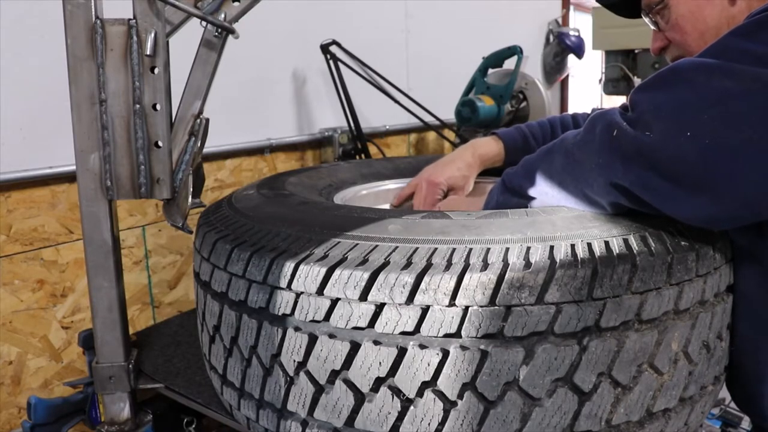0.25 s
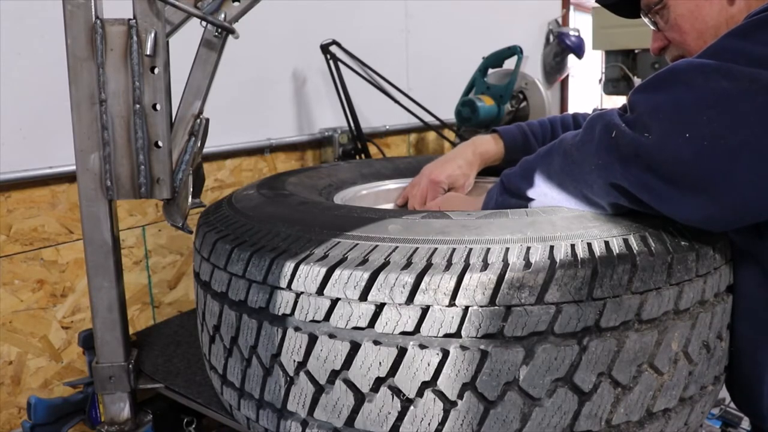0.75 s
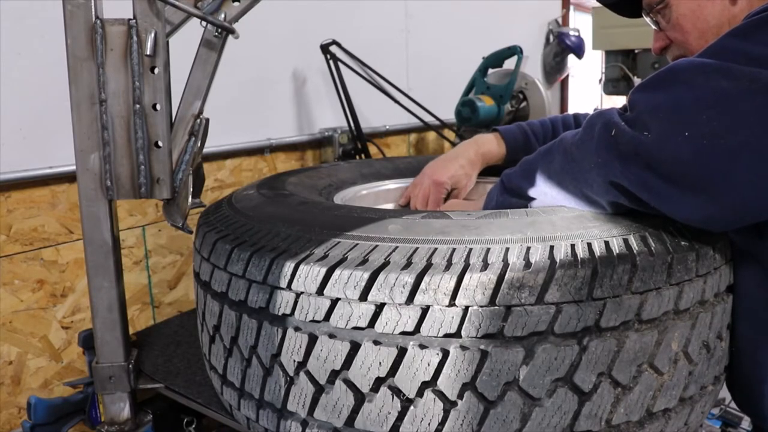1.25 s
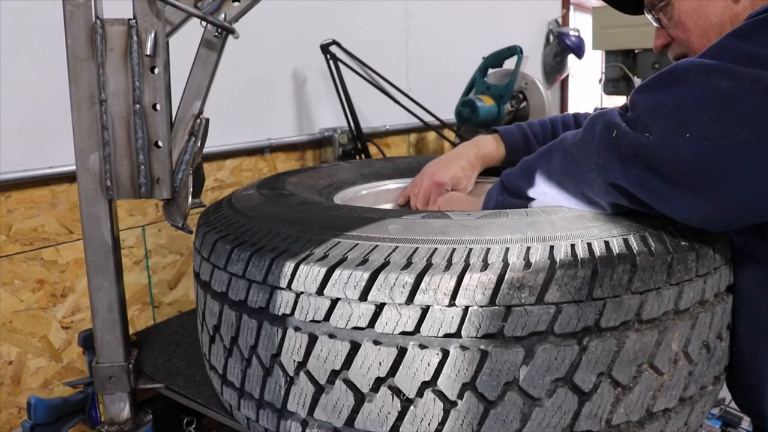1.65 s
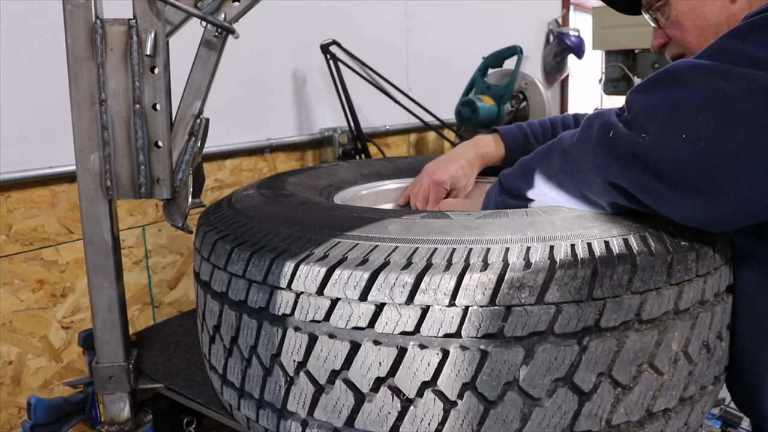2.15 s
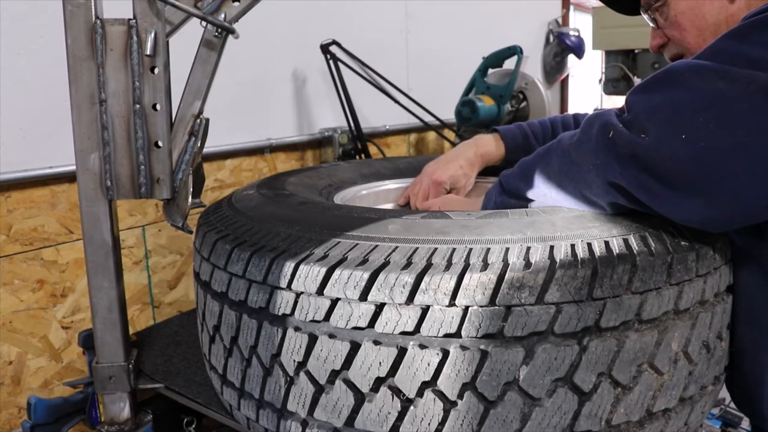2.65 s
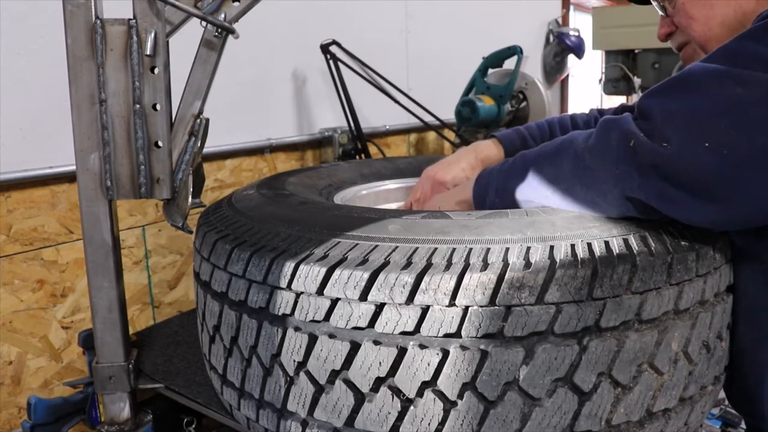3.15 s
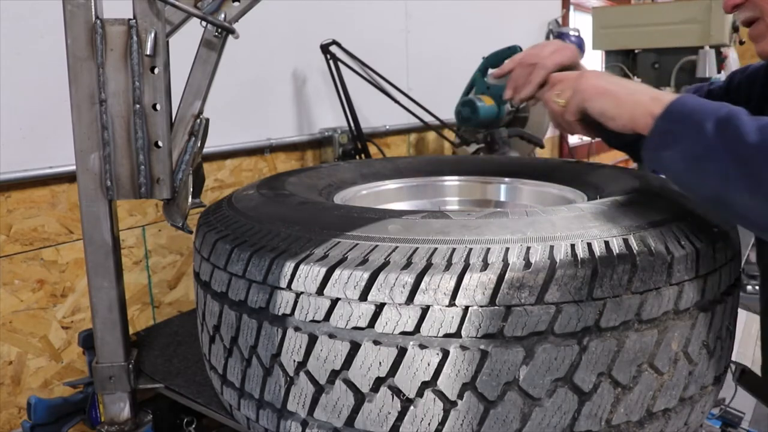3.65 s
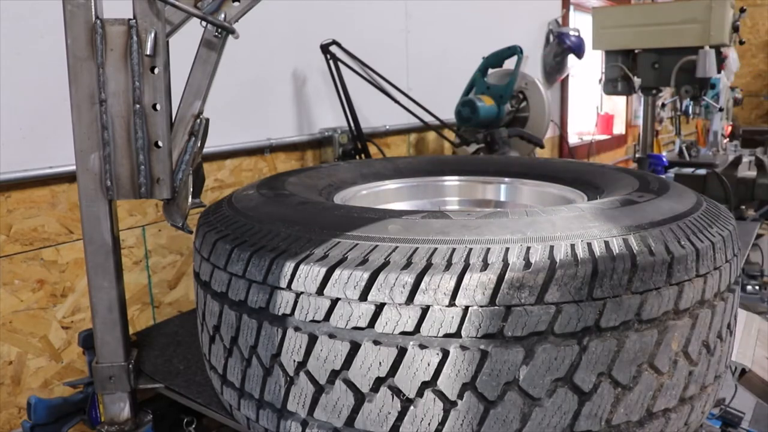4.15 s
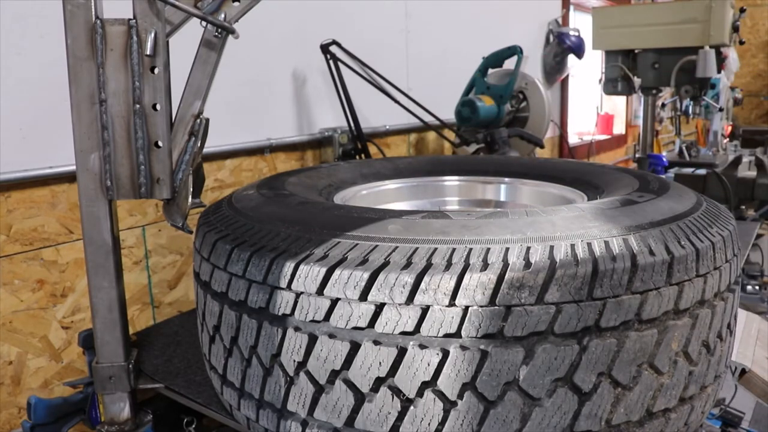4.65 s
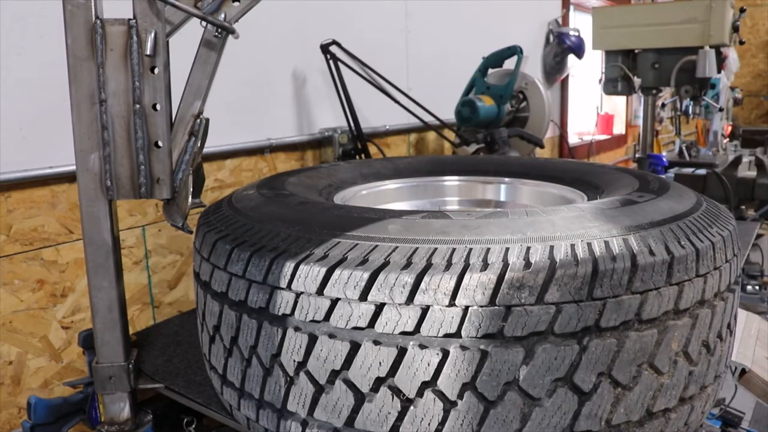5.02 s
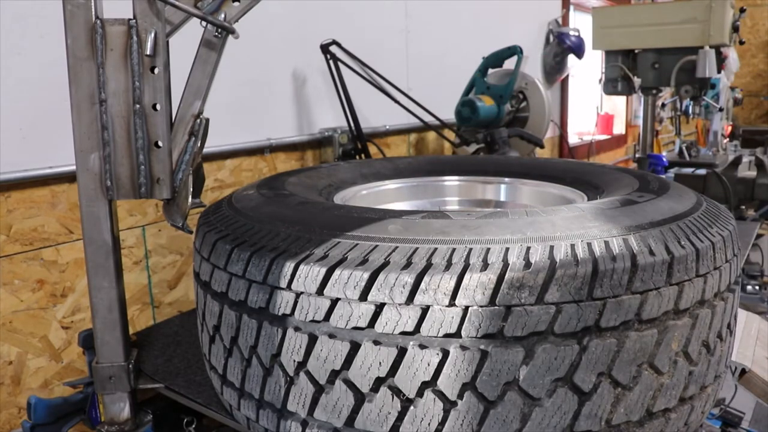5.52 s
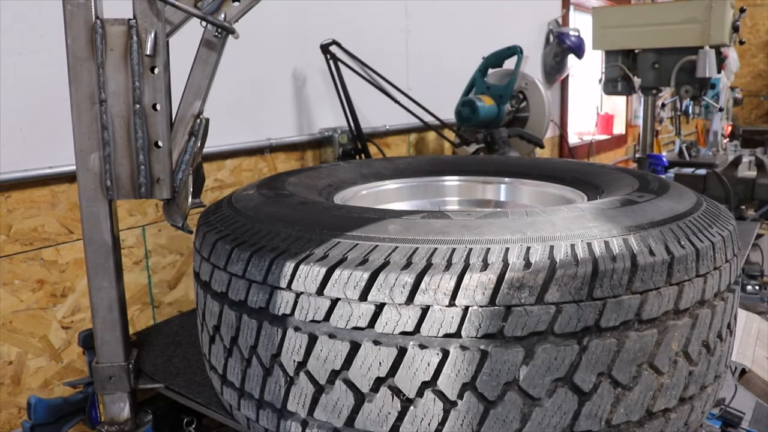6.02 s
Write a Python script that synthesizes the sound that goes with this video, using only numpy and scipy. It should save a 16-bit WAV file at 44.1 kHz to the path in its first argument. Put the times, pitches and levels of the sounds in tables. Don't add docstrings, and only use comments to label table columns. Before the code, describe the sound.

Quiet breathy leak of air under working fingers, a sudden stronger rush, short rubbery squeal and pop, then constant piercing jet of escaping air.

```python
import sys
import numpy as np
from scipy import signal
from scipy.fft import rfft, irfft, next_fast_len
from scipy.io import wavfile
from scipy.ndimage import uniform_filter1d

SR = 44100
rng = np.random.default_rng(int(sys.argv[2]) if len(sys.argv) > 2 else 0)


def output_pcm(signal):
    pcm = np.clip(np.atleast_2d(signal).T, -1, 1) * 32767
    wavfile.write(sys.argv[1], SR, np.round(pcm).astype(np.int16))


def field_ratio(decibels):
    return 10 ** (np.asarray(decibels, dtype=float) / 20)


N = 276948
HOP = 1024
EDGE_HZ = 15740

# t/s, share/0-1
CORE_OUT_SHARE = [(0, 0), (3.02, 0.1), (3.2, 0.42), (3.4, 0.9), (6.28, 1)]


def read(points, hz):
    f, value = np.transpose(points)
    return np.interp(np.log(hz + 1), np.log(f + 1), value)


def evened(x):
    return x / np.sqrt(np.mean(x ** 2) + 1e-20)


def humps_db(modes, hz):
    return sum(db / (1 + (2 * (hz - f) / width) ** 2) for f, width, db in modes)


def coloured(points):
    size = next_fast_len(N)
    hz = np.fft.rfftfreq(size, 1 / SR)
    spectrum = rfft(rng.standard_normal(size)) * field_ratio(read(points, hz))
    return evened(irfft(spectrum, size)[:N])


def turned_down():
    # t/s, share/0-1
    gain_down = [(0, 0), (2.56, 0.08), (2.66, 0.77), (6.28, 0.8)]
    return np.clip(np.interp(np.arange(N) / SR, *np.transpose(gain_down)), 0, 1)


def hiss(patchy_db=0.83, flicker_db=.5):
    # f/Hz, density/dB per Hz
    leak_spectrum = [(240, -58), (400, -28), (536, -33), (596, -12.5), (654, -12), (945, -8.5), (1350, 2),
                     (1980, -9), (3820, -7), (4460, -8), (6250, -9.5), (8900, -7), (9750, -5.5),
                     (11000, -8.5), (15700, -19)]
    # f/Hz, density/dB per Hz
    jet_spectrum = [(240, -54), (400, -19.5), (578, -43), (615, -20.5), (728, -22), (945, -24.5),
                    (1830, -13), (2010, -15.5), (2860, -12.5), (3590, -11.5), (4600, -10.5), (6350, -16),
                    (8900, 1.5), (11900, -12), (15700, -10)]
    # f/Hz, width/Hz, lift/dB
    stem_in = [(8730, 180, 8), (11000, 220, 6), (7000, 260, 5), (4400, 200, 4), (12100, 300, 4)]
    # t/s, flow/dB, lift of low hiss by cupped hands/dB
    flow = [(0, -39, -15.5), (.4, -42, -15), (.65, -40.5, -8), (.79, -40.5, -8.5), (.82, -36.5, -13),
            (1.12, -38, -1.5), (1.21, -38, -8), (1.48, -29.5, -13.5), (1.77, -34, -9.5),
            (1.93, -31.5, -12.5), (2.1, -38.5, -4), (2.33, -36, -7), (2.557, -32, -10), (2.572, -23.5, -12),
            (2.65, -17, -13.5), (3.05, -19.5, -10.5), (3.27, -22, -7), (3.45, -18.5, -18)]
    part_edges_hz = [12500, 6200, 1900]
    # level at full flow/dB, share of flow change, share of cupping, lift with bore free/dB
    parts = [
        (-10, 1.1, -.05, -3),
        (0.13, 1.02, 0.00089, 0.03),
        (-5, 1.005, 0.21, 0.08),
        (0.16, 0.96, 1, -0.23),
    ]
    # t/s, length/s, gain/dB, f/Hz, width/octaves
    slips = [(0.542, 0.025, 12, 13000, 3.5), (.867, 0.019, 4, 3000, 1.2), (0.951, 0.01, 6.5, 3000, 3),
             (1.257, 0.043, 3.5, 9000, 2.6), (1.282, 0.023, 7, 1500, 0.72), (1.64, .016, 8, 2150, 1.5),
             (2.113, .019, 5.5, 2500, 2), (2.373, 0.028, 9, 3250, 2.1), (2.435, .018, -2, 4000, 2.7),
             (2.458, 0.0097, 13.5, 2720, 1.47), (2.596, .03, -5.5, 3000, 1), (2.634, 0.016, 4, 3080, 1.1),
             (2.899, 0.012, -1.5, 9000, 5), (2.957, .05, 1.5, 1100, 1.2), (3.125, 0.05, -6.5, 800, .9),
             (3.205, 0.042, 3.5, 2600, 1.2), (3.218, 0.035, -5.5, 12000, .7), (3.256, 0.053, 10, 790, 0.61),
             (3.41, 0.058, 4.5, 1070, .9), (3.686, .012, -1, 14000, .3), (0.508, 0.044, 7, 900, .9),
             (2.3, .2, 5.5, 14500, 0.32), (2.462, 0.018, 13, 550, 0.83), (3.45, 0.18, 2, 3900, 0.89)]
    # t/s, length/s, gain/dB, f/Hz, glide/(octaves/s)
    hollows = [(.076, .075, 9, 7866, -.5), (.12, .15, 5, 4450, -0.5), (.2, 0.13, 0, 9600, .1),
               (0.47, .06, 4, 6400, .5), (1.335, 0.014, 21, 590, -4), (2.365, 0.039, -11, 5600, 6),
               (2.466, .016, -4, 5600, .1), (2.458, .012, 6, 4200, .1), (2.78, 0.23, -7, 6430, 0.3),
               (3.075, 0.072, 8, 4422, -1.2), (3.103, .064, 5.5, 7860, -1.5), (1.85, .2, 2.5, 11200, 0.5),
               (3.217, 0.019, 10, 2650, -3), (3.224, .012, 8.5, 2200, .1), (0.32, 0.088, 4, 11300, -1),
               (.545, .03, 1, 14000, -3), (0.81, 0.47, 3.5, 7600, -0.1), (.85, 0.18, 2.5, 10600, 0.5),
               (1.287, .1, 5, 11900, 1), (1.3, 0.11, -5.5, 9800, 1), (1.3, 0.22, 1, 4300, .01),
               (0.77, 0.12, 3.5, 1400, 1), (2.0, .05, -9, 1850, .1), (0.57, 0.035, -8, 1750, 2)]
    hollow_octaves, shadow_octaves = 0.13, 0.19
    full_db = -18
    ring_before, ring_after = 0.49, 1.34
    lift_s, lift_rise_s = 1.3, .1

    frames, hz = N // 128 + 5, np.fft.rfftfreq(512, 1 / SR)
    t = np.arange(frames) * 128 / SR
    s, *controls = np.transpose(flow)
    flow_db, cup_db = (np.interp(t, s, c) for c in controls)
    free = np.interp(t, *np.transpose(CORE_OUT_SHARE))
    lifted = np.clip((t - lift_s) / lift_rise_s + .5, 0, 1)
    ringing = ring_before + (ring_after - ring_before) * lifted

    shape_db = np.outer(read(leak_spectrum, hz), 1 - free)
    shape_db += np.outer(humps_db(stem_in, hz), (1 - free) ** 2 * ringing)
    shape_db += np.outer(read(jet_spectrum, hz), free)

    part = sum(hz < edge for edge in part_edges_hz)
    lift_db = []
    for k, (db, follow, cupped, freed_db) in enumerate(parts):
        power = (field_ratio(shape_db[(part == k) & (hz < EDGE_HZ)]) ** 2).sum(0)
        target_db = full_db + db + follow * (flow_db - full_db) + cupped * cup_db + freed_db * free
        lift_db.append(target_db - 10 * np.log10(power))
    shape_db += uniform_filter1d(np.array(lift_db)[part], size=11, axis=0, mode="nearest")

    events = [(*row, 0) for row in slips]
    for s, length, db, f, glide in hollows:
        events.append((s, length, db, f, hollow_octaves if db > 0 else shadow_octaves, glide))
    for s, length, db, centre_hz, octaves, glide in events:
        away = (np.log2((hz[:, None] + 1) / centre_hz) - glide * (t - s)) / octaves
        shape_db += db * np.exp(-away ** 2 - abs((t - s) / length) ** 3)

    a, b, patches = rng.standard_normal((frames, len(hz), 3)).T
    patches = uniform_filter1d(patches, size=6, axis=0)
    patches = evened(uniform_filter1d(patches, size=25, axis=1))
    flicker = evened(uniform_filter1d(rng.standard_normal(frames), size=12))
    z = (a + 1j * b) * field_ratio(shape_db + patchy_db * patches + flicker_db * flicker + 2.0)
    return signal.istft(z, nperseg=512, noverlap=384)[1][:N]


def jet():
    # f/Hz, width/Hz, lift/dB
    stem_out = [(1730, 280, -2), (2860, 260, 2.5), (4200, 46, -0.5), (4490, 160, 3.5), (4710, 40, 6),
                (5450, 120, 7.5), (5770, 70, 5), (7200, 130, 3), (7400, 70, -1.5), (10700, 83, 4.5),
                (11950, 140, -10)]
    x, size = hiss(), next_fast_len(N)
    gain_db = humps_db(stem_out, np.fft.rfftfreq(size, 1 / SR)) - 0.18
    rung = irfft(rfft(x, size) * field_ratio(gain_db), size)[:N]
    free = np.clip(np.interp(np.arange(N) / SR, *np.transpose(CORE_OUT_SHARE)), 0, 1)
    return (1 - free) * x + free * rung


def rumble(shop_db=-57.5, early_db=4, early_s=.25, wander_db=1.54):
    # f/Hz, density/dB per Hz
    shop = [(12, -36), (20, -6), (54, -5.5), (90, -3.5), (124, -4), (147, -5), (270, -4.5), (397, -7.5),
            (478, -10), (600, -9.5), (780, -31), (1320, -120)]
    # f/Hz, density/dB per Hz
    cavity = [(12, -68), (20, -43), (64, -15.5), (85, -26), (109, -1), (124, 4), (189, -10), (307, -5.5),
              (499, -9), (567, -10), (600, -18), (780, -61), (1320, -120)]
    # t/s, level/dB
    cavity_drive = [(2.74, -55.5), (2.86, -54), (3.0, -43), (3.03, -58), (3.118, -65), (3.242, -42.5),
                    (3.38, -39), (3.6, -43), (4.1, -44)]
    # f/Hz, width/Hz, level/dB
    lamp_hum = (120, 12.5, -69)
    t = np.arange(N) / SR
    free = turned_down()
    air = np.sqrt(1 - free) * field_ratio(shop_db + early_db * np.exp(-(t / early_s) ** 2)) * coloured(shop)
    air += np.sqrt(free) * field_ratio(np.interp(t, *np.transpose(cavity_drive))) * coloured(cavity)
    hz, width, db = lamp_hum
    hum = coloured([(hz - 2 * width, -90), (hz - width / 2, 0), (hz + width / 2, 0), (hz + 2 * width, -90)])
    wander = coloured([(1, -30), (3, 0), (8, 0), (14, -40)])
    return field_ratio(wander_db * wander) * air + field_ratio(db) * hum


def microphone_floor(level_db=-47.5):
    # f/Hz, density/dB per Hz
    floor_spectrum = [(400, -33), (600, -5), (1000, -2), (2000, -7), (4400, 1), (9500, -7), (13000, -7),
                      (15700, -2)]
    return field_ratio(level_db - 17 * turned_down()) * coloured(floor_spectrum)


def snap(s, db, hz, length):
    t = np.arange(N) / SR - s
    return field_ratio(db) * np.exp(-(3 * t / length) ** 2) * np.sin(2 * np.pi * hz * t)


def squeal(rows, jitter=.013, wobble_db=2):
    # f/Hz, level/dB
    hand_hollow = [(400, -8), (520, -13), (680, -11.5), (1000, -6), (1400, -0.5), (2000, -11.5),
                   (2700, -10), (3400, -28), (5000, -30)]
    s, *columns = np.transpose(rows)
    t = np.arange(N) / SR
    hz, db, bright_db = (np.interp(t, s, c) for c in columns)
    shake, wobble = (evened(uniform_filter1d(v, size=200)) for v in rng.standard_normal((2, N)))
    pitch = hz * (1 + jitter * shake)
    turns = np.cumsum(pitch) / SR
    stack = np.zeros(N)
    for k in range(1, 8):
        level_db = read(hand_hollow, k * pitch) + bright_db * np.log2(k / 2)
        stack += field_ratio(level_db) * np.cos(2 * np.pi * k * turns + k * k)
    fade = np.clip(np.minimum(t - s[0], s[-1] - t) / 0.0033, 0, 1)
    return field_ratio(db + wobble_db * wobble) * fade * stack


def workshop(x, wet_db=-12, t60=.1):
    t = np.arange(SR // 4) / SR
    taps = rng.standard_normal(len(t)) * (rng.random(len(t)) < .05) * field_ratio(-60 * t / t60)
    taps = field_ratio(wet_db) * taps / np.linalg.norm(taps)
    taps[0] = 1
    return signal.oaconvolve(x, taps / np.linalg.norm(taps))[:N]


def scene():
    # t/s, f/Hz, level/dB, brightness/(dB/octave)
    squeals = [
        [(2.922, 740, -30, -6), (2.934, 682, -18.5, -1.1), (2.955, 650, -19.5, -1.1), (2.967, 558, -20, 0),
         (2.998, 462, -24, 1.1), (3.006, 560, -33, 0), (3.016, 640, -24, -.1), (3.043, 715, -22, -1.1),
         (3.056, 742, -31, -2.1)],
        [(3.195, 1080, -30, -4), (3.205, 1095, -24, -1.1), (3.22, 1090, -23, 3), (3.24, 1030, -27, -4),
         (3.27, 1000, -27, -5), (3.285, 980, -36, -5)],
    ]
    # t/s, level/dB, f/Hz, length/s
    pops = [
        (2.178, -43, 480, .012),
        (2.994, -13, 1290, .014),
        (3.003, -36, 360, .045),
    ]
    valve = jet() + sum(squeal(rows) for rows in squeals) + sum(snap(*row) for row in pops)
    mono = workshop(valve) + rumble() + microphone_floor()
    return np.array([mono, mono])


def difference(preamp_db=-74):
    # f/Hz, density/dB per Hz
    preamp = [(15, 1), (40, 2), (200, 3), (700, -7), (1200, -30)]
    # t/s, low f/Hz, high f/Hz, level/dB
    filled = [(.407, 10980, 12450, -54), (1.15, 4630, 7620, -47), (1.336, 8940, 10400, -48),
              (2.706, 8910, 10400, -27), (2.752, 4630, 6330, -38), (3.333, 6270, 7640, -37),
              (3.333, 11690, 13160, -37), (4.099, 8250, 9710, -25), (4.169, 5170, 7620, -33),
              (4.169, 10290, 11780, -33), (5.562, 8940, 10400, -27), (6.003, 10980, 12470, -38),
              (6.212, 5660, 7620, -33), (6.212, 8980, 10380, -26)]
    side = field_ratio(preamp_db - 25 * turned_down()) * coloured(preamp)
    hz = np.fft.rfftfreq(2 * HOP, 1 / SR)
    window = signal.windows.kaiser_bessel_derived(2 * HOP, 4 * np.pi)
    for (s, lo, hi, db), noise in zip(filled, rng.standard_normal((len(filled), 2 * HOP))):
        at = round(s * SR) - HOP
        band = evened(irfft(rfft(noise) * (hz > lo) * (hz < hi)))
        side[at:at + 2 * HOP] += field_ratio(db + 1.5) * window * band
    return side


def starve(x, left_db=-34):
    # frame number, lines kept near the peak, stray lines f/Hz ..
    starved = [(133, 4, 11614), (160, 10, 4816, 14943), (164, 27, 4441, 4887, 15060), (175, 19),
               (178, 14, 3433, 4465), (182, 21, 4629, 14591), (184, 24, 5262, 5449, 15693),
               (203, 23, 4019, 4465, 13231), (204, 21, 4746, 12856), (219, 19, 3715, 4488, 5449),
               (220, 19, 3762, 4441, 4512), (255, 17, 2777, 5848, 13185), (256, 17, 3996, 4464),
               (258, 22, 2824, 5449, 15100), (266, 27, 1816, 4160, 4417), (279, 16, 4441, 4464, 5753),
               (293, 19, 1792, 4394)]
    # f/Hz, level/dB
    line_step = [(7000, -2.5), (8300, -2), (8500, 3.5), (10300, -1), (10500, -2.5)]
    first, up, down = 208, 160, 147
    n, k = np.arange(2 * HOP), np.arange(HOP)
    window = np.sin(np.pi * (n + .5) / (2 * HOP))
    basis = window * np.cos(np.pi / HOP * np.outer(k + .5, n + .5 + HOP / 2))
    basis *= np.sqrt(2 / HOP)
    hz = (k + .5) * SR * up / down / (2 * HOP)
    step = field_ratio(read(line_step, hz))
    fast = np.pad(signal.resample_poly(x, up, down), (0, HOP))
    change = np.zeros_like(fast)
    peak = (hz > 7000) & (hz < 11400)
    for frame, count, *strays_hz in starved:
        at = first + (frame - 1) * HOP
        lines = basis @ fast[at:at + 2 * HOP]
        strongest = np.argsort(-abs(lines) * peak / step)[:count]
        chosen = np.append(strongest, np.searchsorted(hz, strays_hz)).astype(int)
        kept = (step * np.sign(lines))[chosen] @ basis[chosen]
        change[at:at + 2 * HOP] += kept - (1 - field_ratio(left_db)) * lines @ basis
    return x + signal.resample_poly(change, down, up)[:N]


def top_cut(x):
    return signal.sosfilt(signal.butter(12, 16870, fs=SR, output="sos"), x)


def record(dry):
    lowpass = signal.firwin(1023, EDGE_HZ, window=("kaiser", 9), fs=SR)
    mono = signal.oaconvolve(starve(dry[0]), lowpass, "same")
    side = difference()
    return top_cut(np.array([mono + side, mono - side]))


dry = scene()
out = record(dry)
output_pcm(out)
```